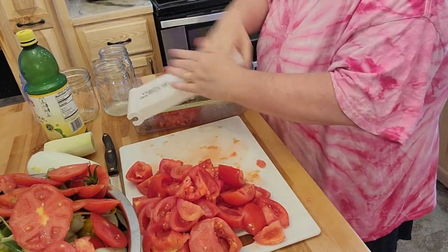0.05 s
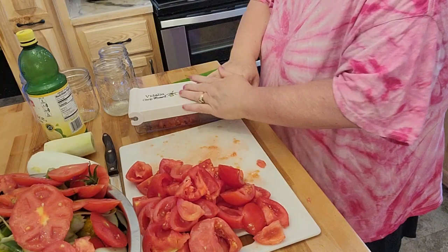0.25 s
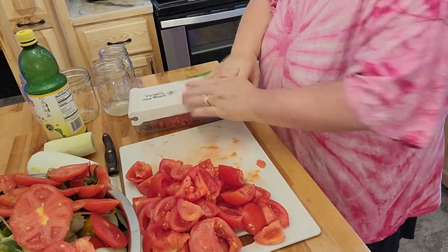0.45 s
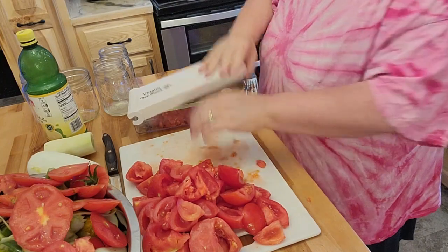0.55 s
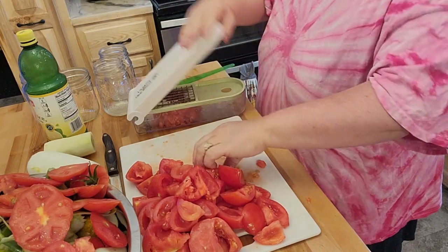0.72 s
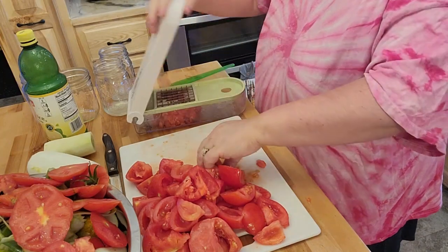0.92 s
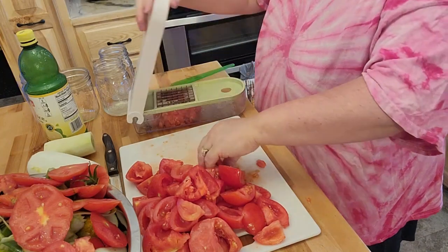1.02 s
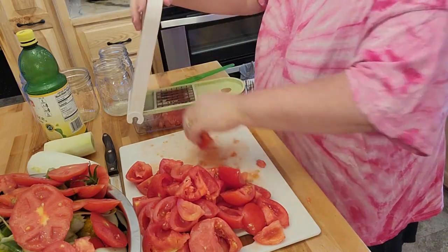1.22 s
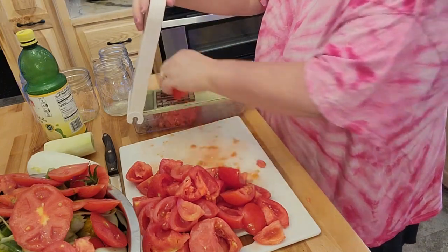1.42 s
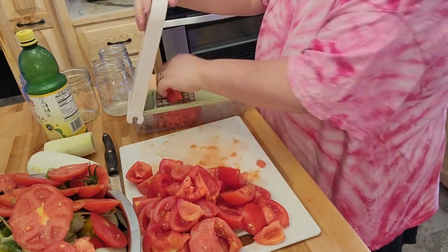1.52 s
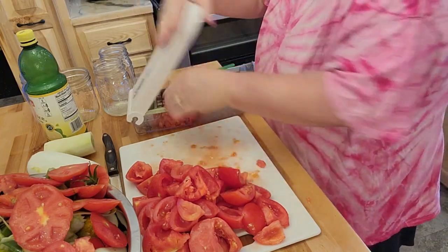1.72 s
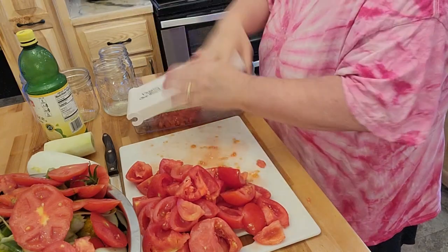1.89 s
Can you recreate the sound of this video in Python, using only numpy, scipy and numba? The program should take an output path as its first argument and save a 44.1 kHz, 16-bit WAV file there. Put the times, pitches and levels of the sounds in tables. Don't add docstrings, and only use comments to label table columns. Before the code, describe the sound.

One sharp plastic slam as a hand chopper cuts tomato on a wooden counter, ringing briefly in the kitchen; then low hum, tiny wet tick, and a softer lid bump, heard about a metre away.

```python
import sys
import numpy as np
from scipy import signal
from scipy.fft import rfft, irfft
from scipy.io import wavfile
from scipy.ndimage import uniform_filter1d
from numba import njit

SR = 44100
rng = np.random.default_rng(int(sys.argv[2]) if len(sys.argv) > 2 else 0)


def unload_wav(signal):
    wavfile.write(
        sys.argv[1],
        SR,
        np.round(np.clip(np.atleast_2d(signal).T, -1, 1) * 32767).astype(np.int16),
    )


def to_linear_factor(level_db):
    exponent = np.asarray(level_db, float) / 20
    return 10 ** exponent


N = 85995
BANDS_HZ = 22 * 2 ** np.arange(0, 10, .5)


def on_log(hz, table, col=1):
    t = np.array(table, float)
    return np.interp(np.log(np.maximum(hz, 1)), np.log(t[:, 0]), t[:, col])


def colour(x, table):
    gain = to_linear_factor(on_log(np.fft.rfftfreq(1024, 1 / SR), table))
    cepstrum = irfft(np.log(gain))
    cepstrum[1:512] *= 2
    cepstrum[513:] = 0
    h = irfft(np.exp(rfft(cepstrum)))
    h = h / np.sqrt(np.sum(h ** 2))
    return signal.fftconvolve(x, h)[..., :len(x)]


def decay(t, t60_s):
    return np.exp(-np.log(1000) * t / t60_s)


def ring(modes, length_s=.4):
    t = np.arange(int(length_s * SR)) / SR
    out = np.zeros(len(t))
    for k, (hz, db, t60_s) in enumerate(modes):
        out += (-1) ** k * to_linear_factor(db) * np.sin(2 * np.pi * hz * t) * decay(t, t60_s)
    return out


def add(out, s, x):
    i = int(s * SR)
    out[i:i + len(x)] += x[:N - i]


@njit
def svf(x, hz, width):
    y, b, l = np.empty(len(x)), 0., 0.
    for i in range(len(x)):
        g, k = np.tan(np.pi * hz[i] / SR), width / hz[i]
        v = (b + g * (x[i] - l)) / (1 + g * (g + k))
        b, l, y[i] = 2 * v - b, l + 2 * g * v, k * v
    return y


def unit(x):
    return x / np.sqrt(np.mean(x ** 2))


def steep(x, hz, width_hz):
    hz = hz + np.zeros(N)
    return unit(svf(svf(x, hz, 1. * width_hz), hz, 5.7 * width_hz))


def slips(rate_per_s):
    scatter_db = 1
    hit = rng.random(N) < rate_per_s / SR
    return hit * rng.choice([-1., 1.], N) * to_linear_factor(scatter_db * rng.exponential(size=N))


def gate(s, db):
    times = np.r_[s[0] - .004, s, s[-1] + .006]
    return to_linear_factor(np.interp(np.arange(N) / SR, times, np.r_[-90, db, -90]))


def walk(rate_hz):
    k = int(SR / rate_hz)
    steps = np.repeat(rng.standard_normal(N // k + 1), k)
    return unit(uniform_filter1d(uniform_filter1d(steps, k), k)[:N])


def pair(noise, hz, same):
    f = np.fft.rfftfreq(2 * noise.shape[1] - 2, 1 / SR)
    octaves = np.log2(f / hz + 1e-9)
    mid, side = irfft(noise * np.cos(np.pi / 2 * np.clip(2 * octaves, -1, 1)) ** 2)
    c = np.clip(same, 0, 1)
    return np.sqrt((1 + c) / 2) * mid + np.sqrt((1 - c) / 2) * side * np.array([[1], [-1]])


def slam():
    # (time [s], body level [dB], crack level [dB])
    impacts = [
        (0.2346, -20.5, -32),
        (.2392, -19.5, -27.5),
        (0.2426, -12, -11),
        (0.2442, -14.5, -12),
        (0.2476, -18, -17.5),
        (0.2516, -17, -20),
        (0.2576, -25.5, -23),
        (.265, -18.5, -27),
        (.296, -31.5, -38.5),
    ]
    # (frequency [Hz], level [dB], t60 [s])
    body = [(200, -6.5, 0.2), (259, -11, 0.076), (325, -2, .05), (416, -6.5, 0.022), (509, -5.5, 0.07),
            (560, -7.5, .035), (712, -5.5, .03), (770, -9, 0.054), (985, -7.5, .035), (1260, -15.5, .025),
            (1612, -23.5, 0.02), (2008, -18, .03), (2340, -21, 0.045), (3480, -19, .025)]
    # (frequency [Hz], level [dB], t60 [s])
    steel = [(657, -4, .04), (845, -14, .05), (1055, -12, .06), (1875, -14, .05), (2150, -14.5, .035),
             (3690, -21, .03), (4590, -24, .03), (4815, -21.5, .04), (5314, -19, .06), (5695, -21, 0.013),
             (7540, -25.5, 0.056)]
    # (frequency [Hz], density [dB per Hz])
    crack_colour = [(700, -24), (1200, -6), (1600, -10.5), (2200, -6.5), (4200, -15), (5600, -9),
                    (8000, -15), (11500, -24), (16000, -33)]
    crack_t60_s, strike_spread_db = 0.010, 2
    out, t = np.zeros(N), np.arange(2000) / SR
    modes = body + steel
    for s, db, crack_db in impacts:
        luck = np.resize(rng.standard_normal(len(body)), len(modes))
        struck = [(hz, d + strike_spread_db * u, t60_s) for (hz, d, t60_s), u in zip(modes, luck)]
        add(out, s, to_linear_factor(db - 2) * ring(struck))
        burst = rng.standard_normal(len(t)) * decay(t, crack_t60_s)
        add(out, s, to_linear_factor(crack_db) * colour(burst, crack_colour))
    return out


def press():
    # (time [s], hollow pitch [Hz], groan level [dB], crackle level [dB])
    stroke = [
        (0.139, 476.8, -37, -63.5),
        (.152, 429.6, -35, -64.5),
        (0.173, 360, -38.5, -64.5),
        (.198, 313.6, -34.5, -61),
        (0.207, 310.7, -46, -53.5),
        (0.215, 310.2, -32.5, -49),
        (0.225, 300, -45.5, -39),
        (0.233, 305, -29, -27),
        (0.241, 312, -27.5, -29),
    ]
    # (frequency [Hz], width [Hz], level [dB])
    upper = [(1170, 120, -12.5), (1770, 200, -29), (720, 140, -8.5)]
    # (frequency [Hz], density [dB per Hz])
    crackle_colour = [(530, -32.5), (900, -2), (1310, -5), (4440, -12), (5710, -13), (6280, -15.5),
                      (15800, -33.5)]
    tone_db, rough_db, width_hz = -4, -3, 80
    s, pitch_hz, groan_db, crackle_db = np.array(stroke).T
    drive = slips(2200)
    hz = np.interp(np.arange(N) / SR, s, pitch_hz)
    groan = to_linear_factor(tone_db) * np.sqrt(2) * np.sin(2 * np.pi * np.cumsum(hz) / SR)
    groan += to_linear_factor(rough_db) * steep(drive, hz, width_hz)
    for f, w, db in upper:
        groan += to_linear_factor(db) * steep(drive, f, w)
    crackle = unit(colour(slips(12000), crackle_colour))
    return groan * gate(s, groan_db) + crackle * gate(s, crackle_db)


def bumps():
    # (time [s], level [dB], hollow pitch [Hz], overtone level [dB],
    # t60 [s])
    contacts = [(0.132, -36, 507, -29.5, 0.04), (.1391, -11, 520, -5, 0.0098),
                (.1394, -24.5, 720, -4.5, 0.013), (.1400, -29, 431, -20, .06),
                (0.1392, -32, 1387, -20, .03), (.1400, -34.5, 1710, -30, .015),
                (.1455, -25, 703, -13, 0.035), (.1480, -21.5, 600, -5, 0.012), (.1745, -27, 365, -19, .03),
                (.2320, -12.5, 325, -17.5, 0.053), (.2428, 0, 523.5, -6.5, .016),
                (.2479, -5.5, 540, -7.5, .012), (.2518, -9.5, 520, -6, .02),
                (.1393, -44.5, 3000, -30, .012), (.1393, -50, 4475, -40, .01),
                (.1665, -21, 520, -19, 0.015), (.2150, -42.5, 1369, -29.5, .025),
                (.2940, -25, 530, -25.5, .09), (.2640, -19.5, 215, -20, .07), (.464, -42.5, 769, -24, .04),
                (.515, -46, 290, -20, .06), (.572, -49, 680, -20, .05), (.598, -60, 660, -20, .05),
                (.460, -43, 283, -8, 0.11), (0.2081, -33.5, 1380, -30.5, .035),
                (.6795, -49.5, 570, -13.5, 0.035), (.689, -55, 720, -11, 0.044), (.692, -54, 500, -25, .06),
                (1.5853, -46.5, 560, -17, .025), (1.594, -52, 625.5, -26.5, 0.039),
                (1.711, -56, 611, 5, .05), (1.713, -59.5, 1472, -34, 0.1), (1.898, -43.5, 657, 2.5, 0.07),
                (1.9352, -43, 560, -7.5, 0.05), (1.9440, -19, 590, -7, 0.029)]
    # (multiple of hollow pitch [ratio], level [dB])
    overtones = [(1.95, -3), (2.6, -18), (1.3, -16)]
    rise_s, lower_db, overtone_life, low_cut_hz = 0.00044, -9.5, .85, 270
    out = np.zeros(N)
    for s, db, hz, over_db, t60_s in contacts:
        modes = [(hz, 0, t60_s), (hz * .75, lower_db, t60_s * 2.1)]
        modes += [(hz * m, d + over_db, t60_s * overtone_life) for m, d in overtones]
        x = ring(modes)
        t = np.arange(len(x)) / SR
        add(out, s, to_linear_factor(db) * x * (1 - np.exp(-(t / rise_s) ** 2)))
    return signal.sosfilt(signal.butter(2, low_cut_hz, "high", fs=SR, output="sos"), out)


def thuds():
    # (time [s], frequency [Hz], level [dB], rise [s], t60 [s])
    blows = [
        (.24, 75, -18.5, .02, .22),
        (.232, 155, -23, .004, .12),
        (.238, 118, -30, .004, .13),
        (.139, 140, -50, .004, .15),
        (.09, 70, -54, .02, .3),
    ]
    out = np.zeros(N)
    for s, hz, db, rise_s, t60_s in blows:
        x = ring([(hz, db, t60_s)])
        t = np.arange(len(x)) / SR
        add(out, s, x * (1 - np.exp(-t / rise_s)))
    return out


def ticks():
    # (time [s], level [dB])
    wet = [
        (1.5443, -48),
        (1.552, -74.5),
        (1.576, -62),
    ]
    # (frequency [Hz], level [dB], t60 [s])
    tick_modes = [(3600, 1.5, 0.0065), (5600, 2, .008), (7350, 2, .005), (8970, -0.5, 0.0036),
                  (11500, -14, .003)]
    # (time [s], level [dB])
    skin_snaps = [
        (0.2089, -37),
        (.2150, -39),
        (.2225, -42),
        (0.229, -38),
    ]
    # (time [s], level [dB])
    dull_snaps = [
        (.139, -42.5),
        (.458, -42.5),
        (0.465, -53),
        (1.899, -59),
        (1.944, -47),
    ]
    # (frequency [Hz], density [dB per Hz])
    snap_colour = [(600, -25), (1400, 6.5), (2500, -6.5), (5000, -11.5), (8500, -4.5), (11000, -21.5),
                   (16000, -31)]
    snap_s, dull_top_hz = .0022, 4300
    out, dull, t = np.zeros(N), np.zeros(N), np.arange(1500) / SR
    for s, db in wet:
        burst = np.exp(-t / .00003) + 0.064 * rng.standard_normal(len(t)) * np.exp(-t / 0.016)
        add(out, s, to_linear_factor(db - 11.0) * np.convolve(burst, ring(tick_modes, .03)))
    for track, rows in ((out, skin_snaps), (dull, dull_snaps)):
        for s, db in rows:
            burst = rng.standard_normal(len(t)) * np.exp(-t / snap_s)
            add(track, s, to_linear_factor(db) * colour(burst, snap_colour))
    return out + signal.sosfilt(signal.butter(4, dull_top_hz, fs=SR, output="sos"), dull)


def hinge():
    # (time [s], level [dB])
    swings = [
        [(0, -66), (.015, -59.5), (.045, -71.5), (.07, -51.5), (.085, -58), (.11, -60.5), (.125, -55),
         (.14, -48.5)],
        [(.50, -71), (.55, -67), (.58, -65), (.62, -70)],
        [(1.72, -71), (1.80, -73.5), (1.86, -70), (1.89, -59), (1.915, -68), (1.94, -49), (1.95, -43.5)],
    ]
    # (frequency [Hz], width [Hz], level [dB])
    resonances = [(570, 180, 0), (720, 370, -12), (1210, 70, -8.5), (1700, 400, -16), (3460, 2000, -29)]
    drive = slips(3000)
    rub = sum(to_linear_factor(db) * steep(drive, hz, width_hz) for hz, width_hz, db in resonances)
    return rub * sum(gate(*np.array(swing).T) for swing in swings)


def shiver():
    # (frequency [Hz], density [dB per Hz], t60 [s], left-right likeness [0-1])
    bands = [(200, -5.5, 0.24, .9), (500, -3.5, 0.15, 0.9), (1180, -4, .45, 0.21), (2500, -3.5, 0.27, 0.25),
             (4960, -13.5, 0.54, .1), (7900, -22, 0.17, .1), (16000, -24.5, 0.23, .1)]
    start_s, level_db, rise_s = .244, -29, 0.0023
    t = np.arange(32768) / SR
    noise, out, buzz = rfft(rng.standard_normal((2, len(t)))), np.zeros((2, N)), 0
    for hz in BANDS_HZ[BANDS_HZ > 150]:
        fade = decay(t, on_log(hz, bands, col=2)) * (1 - np.exp(-t / rise_s))
        buzz = buzz + to_linear_factor(on_log(hz, bands)) * fade * pair(noise, hz, on_log(hz, bands, col=3))
    for ear, x in zip(out, buzz):
        add(ear, start_s, to_linear_factor(level_db + 15.0) * x)
    return out


def palm():
    # (time [s], level [dB])
    slide = [
        (.44, -58),
        (.50, -68.5),
        (.545, -70),
        (.572, -67.5),
        (.61, -79.5),
    ]
    # (frequency [Hz], density [dB per Hz])
    skin_colour = [(1000, -11.5), (3000, 0), (6500, -2), (9500, -15), (15000, -16), (16000, -30)]
    grains = np.array([unit(colour(slips(11000), skin_colour)) for _ in range(2)])
    return grains * gate(*np.array(slide).T)


def room(x):
    # (frequency [Hz], level [dB], t60 [s], left-right likeness [0-1])
    bands = [(60, -14, .2, .3), (150, -10, .27, .95), (358, -12, 0.49, 0.3), (800, -9.5, 0.5, 0),
             (2000, -4.5, 0.46, 0.2), (4940, -6.5, 0.33, 0), (9900, -7, 0.31, 0.03), (16000, -5.5, .32, 0)]
    onset_s = 0.0076
    t = np.arange(32768) / SR
    echo, noise = 0, rfft(rng.standard_normal((2, len(t))))
    for hz in BANDS_HZ:
        fade = decay(t, on_log(hz, bands, col=2)) * (1 - np.exp(-(t / onset_s) ** 2))
        fade = fade / np.sqrt(np.sum(fade ** 2))
        echo = echo + to_linear_factor(on_log(hz, bands)) * fade * pair(noise, hz, on_log(hz, bands, col=3))
    return signal.fftconvolve(x[None], echo, axes=1)[:, :N]


def air():
    # (frequency [Hz], density [dB per Hz])
    spectrum = [(20, -36.5), (45, -12.5), (75, -4), (160, -5), (600, -15.5), (3200, -20.5), (5500, -31),
                (9300, -57)]
    # (frequency [Hz], left-right likeness [0-1])
    likeness = [(30, .8), (125, .95), (500, 0.1), (2000, 0), (8000, 0), (16000, .05)]
    # (frequency [Hz], level [dB])
    hum_tones = [(59.2, -76), (118.4, -73.5)]
    air_db, rumble_hz, rumble_width_hz, rumble_db = -61.5, 71, 12, -68.5
    t, swell = np.arange(N) / SR, walk(1.0)
    noise, out = rfft(rng.standard_normal((2, 98304))), 0
    for hz in BANDS_HZ:
        level_db = on_log(hz, spectrum) + 0.72 * swell + .9 * walk(3.1)
        out = out + to_linear_factor(level_db) * pair(noise, hz, on_log(hz, likeness))[:, :N]
    rumble = svf(rng.standard_normal(N), rumble_hz + 0 * t, 1. * rumble_width_hz)
    hum = sum(to_linear_factor(db) * np.sqrt(2) * np.sin(2 * np.pi * hz * t) for hz, db in hum_tones)
    return to_linear_factor(air_db - 3.5) * unit(out) + to_linear_factor(rumble_db) * unit(rumble) + hum


def hiss():
    hiss_db, bright_db, bright_top_hz = -85.5, -75.5, 8500
    edge = signal.butter(8, bright_top_hz, fs=SR, output="sos")
    bright = signal.sosfilt(edge, rng.standard_normal((2, N)))
    return to_linear_factor(hiss_db) * rng.standard_normal((2, N)) + to_linear_factor(bright_db) * bright


def scene():
    # (frequency [Hz], level [dB])
    shade = [(60, -10), (150, -27.5), (400, -17), (1000, -9), (3000, -2), (16000, 0.5)]
    low_cut_hz, left_db = 36, 1.3
    near = slam() + press() + bumps() + thuds() + ticks() + hinge()
    near = signal.sosfilt(signal.butter(4, low_cut_hz, "high", fs=SR, output="sos"), near)
    mirrored = np.r_[near, near[::-1]]
    quarter_turn = 1j * to_linear_factor(on_log(np.fft.rfftfreq(2 * N, 1 / SR), shade))
    side = irfft(rfft(mirrored) * quarter_turn)[:N]
    direct = near + side * np.array([[1], [-1]])
    mix = direct + shiver() + palm() + room(near) + air() + hiss()
    return mix * to_linear_factor(np.array([[left_db], [-left_db]]) / -2)


def roll_off(x):
    return signal.sosfilt(signal.butter(12, 15960, fs=SR, output="sos"), x)


def record(dry):
    top = .97
    rounded = dry / (1 + (np.abs(dry) / top) ** 6) ** (1 / 6)
    return roll_off(rounded)


dry = scene()
out = record(dry)
unload_wav(out)
```